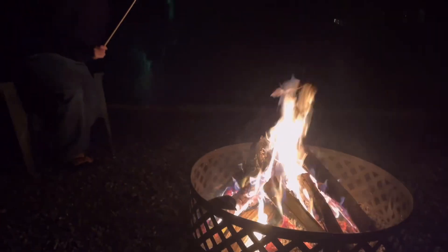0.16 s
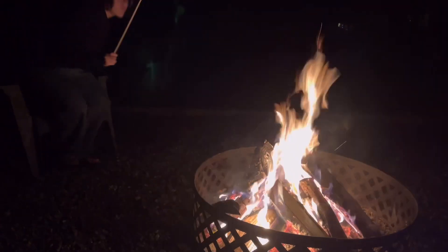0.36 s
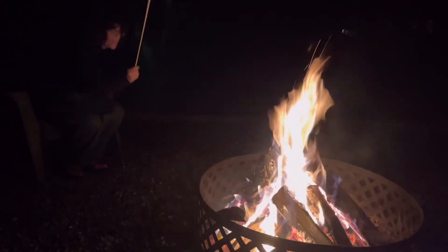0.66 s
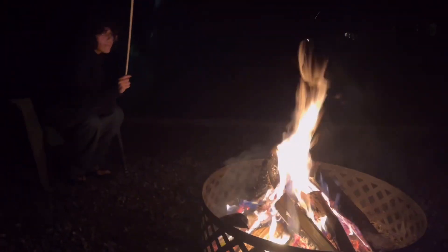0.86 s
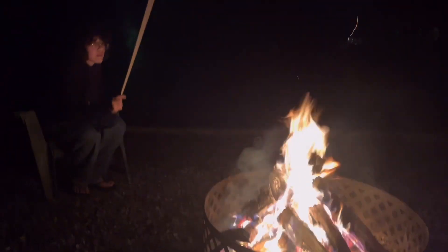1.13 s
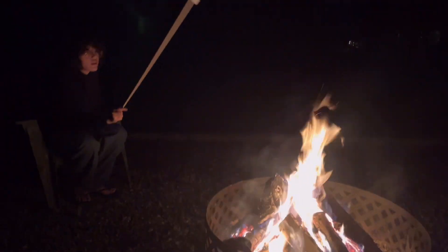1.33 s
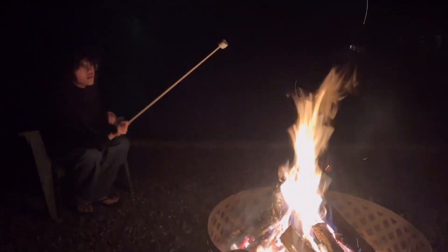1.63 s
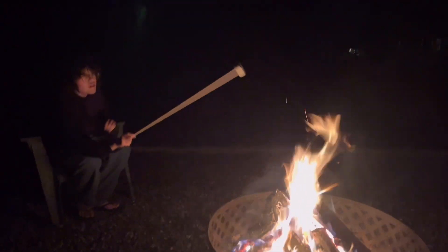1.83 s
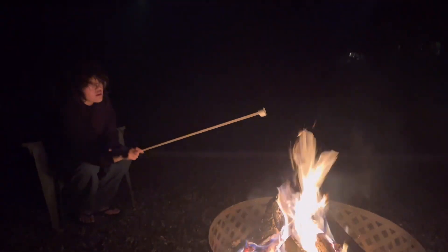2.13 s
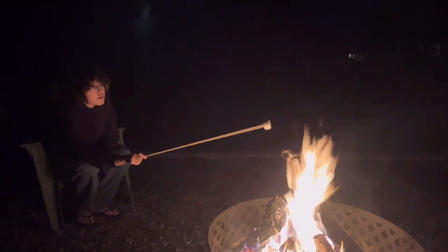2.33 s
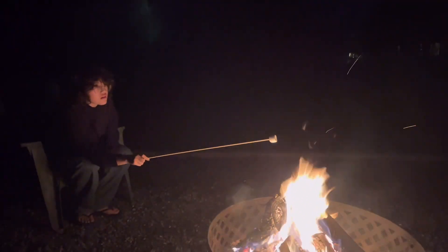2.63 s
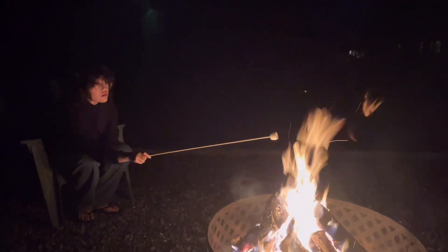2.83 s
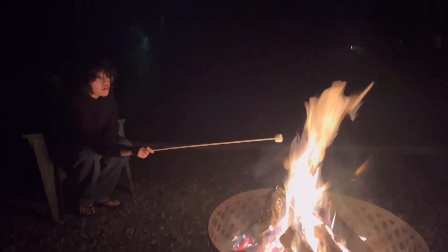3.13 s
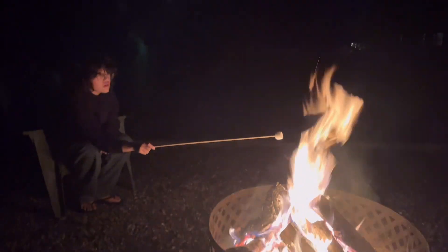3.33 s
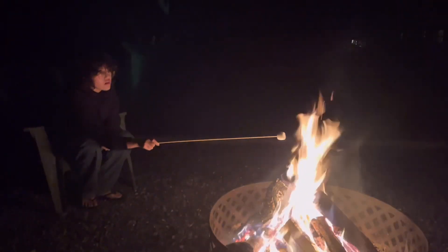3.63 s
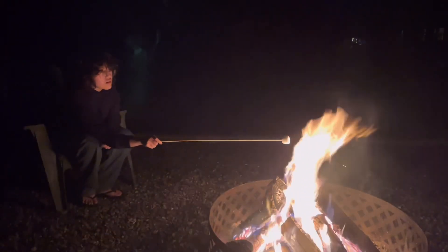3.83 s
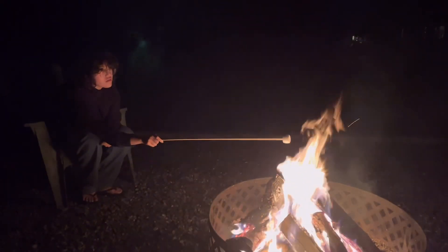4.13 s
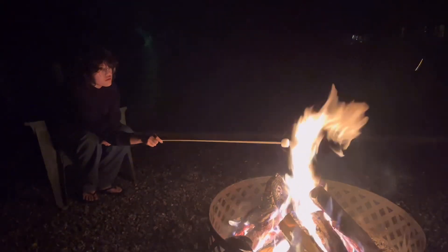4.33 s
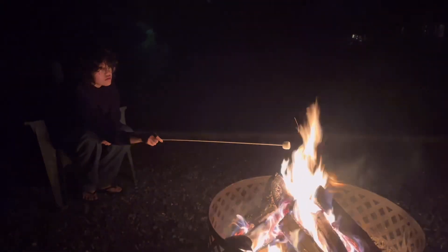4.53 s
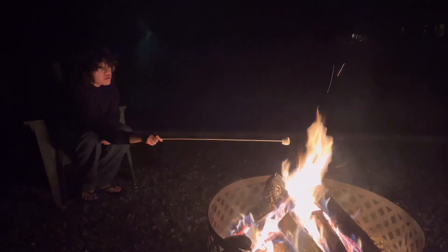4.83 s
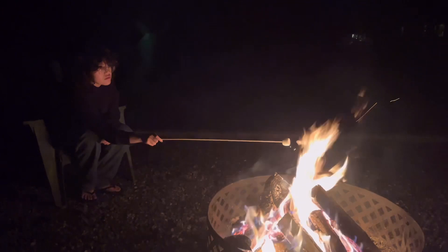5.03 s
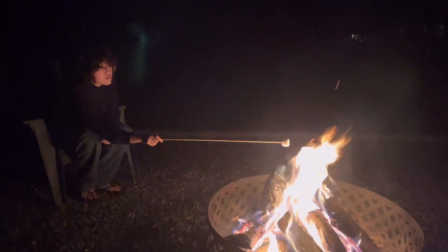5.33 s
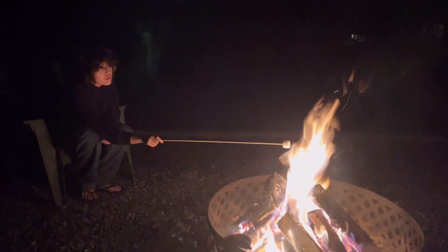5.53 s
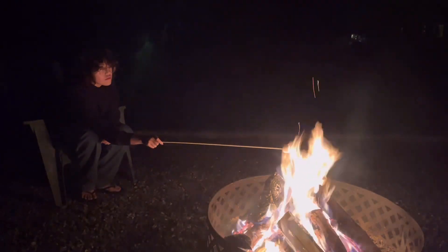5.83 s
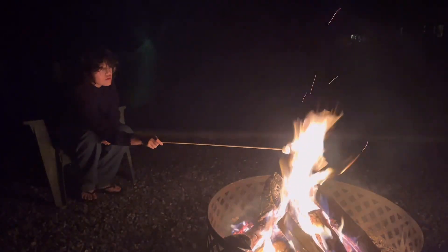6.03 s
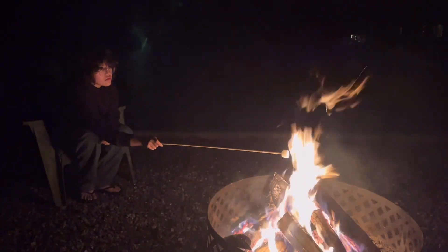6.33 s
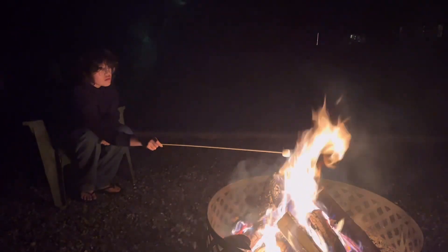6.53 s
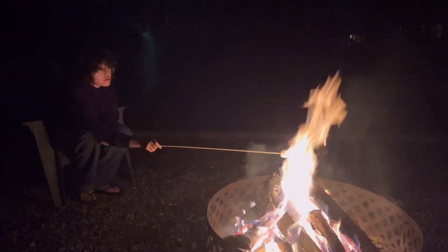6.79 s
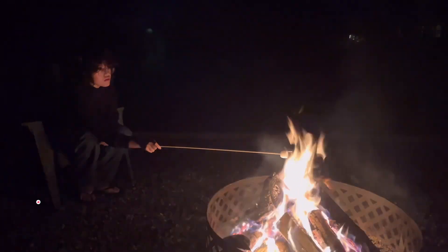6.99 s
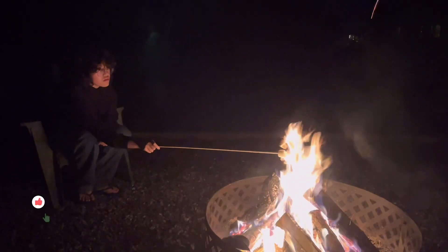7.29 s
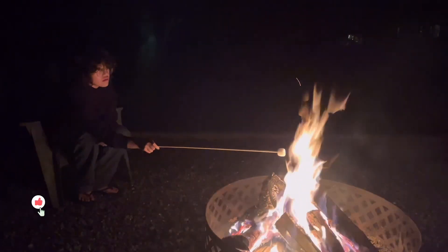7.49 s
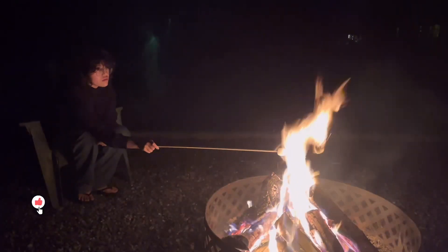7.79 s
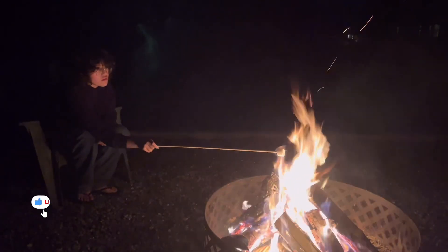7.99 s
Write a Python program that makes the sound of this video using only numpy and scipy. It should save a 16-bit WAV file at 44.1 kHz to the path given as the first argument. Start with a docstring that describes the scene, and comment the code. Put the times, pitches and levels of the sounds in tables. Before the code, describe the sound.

Close campfire snaps and pops at night, two loud bangs echoing off trees, amid a dense cricket chorus, pulsing katydid rasps and brief frog trills.

```python
"""Wood fire among night insects

A wood fire on a lawn: the flames rush low (shaped noise), the logs crackle (short decaying noise and tones)
and twice burst loudly, each burst washing back from the trees. A tree frog trills twice (upward sweeps),
crickets chirp in a dense chorus (sinking tones over noise) and a katydid rasps in swells high above them.
"""
import sys
import numpy as np
from scipy import signal
from scipy.fft import rfft, irfft, next_fast_len
from scipy.io import wavfile
from scipy.ndimage import map_coordinates

SR = 44100
rng = np.random.default_rng(int(sys.argv[2]) if len(sys.argv) > 2 else 0)


def to_wav(s):
    """Save 16-bit WAV."""
    ch = np.atleast_2d(s).T  # columns
    pcm = np.round(np.clip(ch, -1, 1) * 32767)  # PCM
    wavfile.write(sys.argv[1], SR, pcm.astype(np.int16))


N = 359415  # length in samples

# The bright snap of breaking wood. Each row: frequency in Hz, relative strength in dB per Hz.
SNAP = [(4800, -43), (5600, -8.5), (6150, 1), (6860, -6), (7440, 4), (8070, 1.5), (8700, -5.5),
        (9900, -2.5), (11000, -14.5)]
# The woody body of a crack. Each row: frequency in Hz, relative strength in dB per Hz.
BODY = [(1200, -34), (1800, -19), (2400, -5), (3100, -6), (4100, -3), (4650, 7.5), (5100, -13), (5700, -11)]
# Gas pockets bursting. Each row: start in seconds, level in dB, time to die by 60 dB in seconds,
# thud in dB relative to the burst (before its trim), level of the wash that follows in dB.
BURSTS = [(1.9973, -6, 0.047, -7.5, -29.5), (5.3402, -5, 0.042, -8.5, -31)]


def amp(db):
    """Turn decibels into a gain."""
    return 10 ** (np.asarray(db) / 20)


def unit(x):
    """Scale a sound to an average (rms) strength of 1."""
    return x / np.sqrt(np.mean(x ** 2) + 1e-20)


def along(points, hz):
    """Read a curve of (Hz, value) points on a logarithmic frequency axis."""
    f, v = np.transpose(points)
    return np.interp(np.log(hz + 1), np.log(f + 1), v)


def curves(rows):
    """Draw lines through timed rows: one value per sample for each column after the time."""
    s, *cols = np.transpose(rows)
    return [np.interp(np.arange(N) / SR, s, c) for c in cols]


def wobble(rate):
    """A smooth random curve with rate knots a second, running back over its knots if they run out."""
    knots = rng.standard_normal(2048)
    return map_coordinates(knots, [np.arange(N) * rate / SR], mode="mirror")


def filtered(x, response):
    """Multiply the spectrum of x by a response that depends on frequency."""
    m = next_fast_len(len(x) + 8192)
    hz = np.fft.rfftfreq(m, 1 / SR)
    return irfft(rfft(x, m) * response(hz), m)[:len(x)]


def resonance(f, centre, width):
    """Response of one resonance: 1 at its centre, weaker to both sides."""
    return 1j * f * width / (centre * centre - f * f + 1j * f * width)


def coloured(x, spectrum):
    """Give x a spectrum with steep skirts beyond its ends, at rms 1."""
    lo, hi = spectrum[0][0], spectrum[-1][0]

    def response(hz):
        skirts = np.minimum(hz / lo, 1) ** 4 * np.minimum(hi / (hz + 1), 1) ** 4
        return amp(along(spectrum, hz)) * skirts

    return unit(filtered(x, response))


def noise(spectrum):
    """Coloured noise of rms 1."""
    return coloured(rng.standard_normal(N), spectrum)


def add(track, s, sound):
    """Mix a sound into the track from time s, in seconds."""
    start = round(s * SR)
    part = sound[max(-start, 0):max(N - start, 0)]
    track[max(start, 0):][:len(part)] += part


def fracture(t, hold, t60):
    """Wood tears for a moment at full strength, then the sound dies by 60 dB in t60 seconds."""
    onset = 1 - np.exp(-t / 0.000099)
    return onset * amp(-60 * np.maximum(t - hold, 0) / t60)


def burst_of(source, shape):
    """A random stretch of noise under a shape, scaled to strength 1 over its first 4 ms."""
    start = int(rng.random() * (N - len(shape)))
    piece = source[start:][:len(shape)] * shape
    return piece / np.std(piece[:SR // 250])


def night_air(air_db=-37):
    """The faint, slightly swaying air of the night, as shaped noise."""
    # Each row: frequency in Hz, relative strength in dB per Hz.
    night_colour = [(150, -60), (280, -12.5), (400, 2.5), (640, 1.5), (1000, -6.5), (1380, -9), (1620, -18),
                    (2300, -8), (3200, -16.5), (5000, -35), (5600, -45), (7500, -14.5), (10000, -17.5),
                    (16000, -58.5)]
    return amp(air_db + wobble(10.0)) * noise(night_colour)


def drones():
    """Thin, grainy buzzes of far insects come and go: tones unsteady in pitch and level."""
    # Each row: start in seconds, end in seconds, middle pitch in Hz, level in dB before it wavers.
    held_notes = [(1.0, 1.52, 3494, -48), (3.25, 3.7, 3520, -52), (4.7, 5.3, 3500, -53),
                  (2.0, 2.4, 6630, -53), (3.25, 4.4, 6630, -54), (7.0, 7.34, 4950, -35)]
    out = np.zeros(N)
    for start, end, middle_hz, db in held_notes:
        hz = middle_hz + 40 * wobble(200)
        note = np.sin(2 * np.pi * np.cumsum(hz) / SR) * amp(db + 4 * wobble(90))
        size = int((end - start) * SR)
        add(out, start, note[:size] * signal.windows.tukey(size))
    return out


def cricket(chirps, top_hz, fall_hz, db, share):
    """A wing stroke slows towards its end, so every chirp sinks in pitch, each a little differently."""
    # chirps counts the cycles; the stroke fills the last share of each one
    stroke = np.clip(1 - (1 - chirps % 1) / share, 0, 1)
    hz = top_hz - fall_hz * (1 + .15 * wobble(7)) * stroke ** 2
    hz += 30 * wobble(7) + 25 * wobble(300)
    swell = np.abs(np.sin(np.pi * stroke ** 1.2))
    swell *= amp(1.5 * wobble(6) + 2.5 * wobble(150))
    return amp(db) * swell * np.sin(2 * np.pi * np.cumsum(hz) / SR)


def crickets(chorus_db=-2.5, others_db=-38, count=7):
    """Two near crickets stand out of several further ones and a far chorus blurred into noise."""
    # The far chorus. Each row: frequency in Hz, relative strength in dB per Hz.
    chorus_colour = [(3300, -20), (3900, -12), (4150, -2.5), (4470, 3.5), (4750, -2.5), (5050, -7.5),
                     (5500, -12)]
    # Its course. Each row: time in seconds, level in dB before chorus_db and the flutter are added.
    chorus_level = [(0.0, -27), (1.23, -32), (1.43, -30.5), (2.09, -31.5), (2.61, -34), (3.22, -32.5),
                    (6.17, -33.5), (6.42, -30.5), (6.7, -35.5), (8.15, -28.5)]
    # Near crickets. Each row: start of a cycle in seconds, chirps per second,
    # slowing in chirps per second each second.
    near_pace = [(-.002, 7.06, .044), (-.1, 6.13, 0)]
    # Their voices. Each row: top pitch in Hz and fall in Hz, both before wavering,
    # level in dB before flutter, sounding share of a cycle.
    near_voices = [(4317, 385, -31, 0.48), (4600, 410, -37.5, 0.39)]
    t = np.arange(N) / SR
    level_db = curves(chorus_level)[0] + chorus_db + 2.68 * wobble(60)
    out = amp(level_db) * noise(chorus_colour)
    for start, pace, size in rng.random((count, 3)):
        chirps = start + (6 + 2 * pace) * t + 0.1013 * wobble(2.6)
        out += cricket(chirps, top_hz=4400 + 380 * size, fall_hz=257.5, db=others_db, share=.4)
    for (start, rate, slowing), voice in zip(near_pace, near_voices):
        chirps = (rate - slowing * t / 2) * (t - start)
        out += cricket(chirps, *voice)
    return out


def katydid(stroke_hz=265, high_db=0, low_db=0, far_sway_db=2, uneven_db=1):
    """Fast uneven scrapes excite two wing resonances, in swells two or three times a second."""
    # Upper wing resonance. Each row: frequency in Hz, relative strength in dB per Hz.
    upper_colour = [(12300, -20), (13200, -10), (13700, -6), (14050, 1.5), (14450, -3), (15000, -13),
                    (15550, -16), (15900, -18)]
    # Lower wing resonance. Each row: frequency in Hz, relative strength in dB per Hz.
    lower_colour = [(9500, -25), (10500, -13.5), (11200, 1.5), (11600, 9), (12000, 1), (12600, 2),
                    (13400, -30)]
    # Each row: crest in seconds, level in dB, lower resonance in dB relative to the upper,
    # half length in seconds.
    swell_rows = [(0.284, -21, -9, 0.089), (0.97, -24, -8, 0.13), (1.203, -39, -0.5, 0.13),
                  (1.686, -24, -6.5, 0.096), (1.95, -39, -4, 0.057), (2.322, -26, -19, 0.083),
                  (2.745, -25.5, -4.5, 0.079), (3.174, -25.5, -14, 0.11), (3.613, -27.5, -4.5, 0.086),
                  (4.067, -25.5, -13, 0.11), (4.277, -27.5, -3.5, 0.084), (4.755, -25, -12, 0.1),
                  (5.202, -26.5, -3, 0.085), (5.65, -24, -9, 0.076), (6.02, -28, -1, 0.088),
                  (6.46, -27.5, -7, 0.11), (6.91, -29, -1, 0.086), (7.38, -29.5, -8, 0.12),
                  (7.577, -28.5, 0, 0.091), (8.036, -28, -7, 0.12)]
    swell_shape = 1.6  # 1 is pointed, 2 is a bell
    far_high_db, far_low_db = -45, -44.5  # rasp of further katydids, before it sways
    t = np.arange(N) / SR
    far = amp(far_sway_db * wobble(3.7))
    upper, lower = amp(far_high_db) * far, amp(far_low_db) * far
    for s, db, lower_rel, half in swell_rows:
        swell = amp(db) * np.exp(-np.abs((t - s) / half) ** swell_shape)
        upper = np.hypot(upper, swell)
        lower = np.hypot(lower, amp(lower_rel) * swell)
    phase = 2 * np.pi * np.cumsum(stroke_hz * (1 + 0.19 * wobble(40))) / SR
    scrape = (1 + .3 * np.sin(phase)) * amp(1.5 * wobble(700) + .8 * wobble(90))
    teeth = scrape * amp(uneven_db * wobble(25)) * rng.standard_normal(N)
    high_rasp = amp(high_db) * upper * coloured(teeth, upper_colour)
    low_rasp = amp(low_db) * lower * coloured(teeth, lower_colour)
    return high_rasp + low_rasp


def frog(pulse_gap=.0415, echo_s=.047, echo_db=-13, pitch_scatter=.012, jitter=0.016):
    """A tree frog's trill: quick upward sweeps, boosted by the vocal sac; a wall answers each one."""
    # Each row: first pulse in seconds, last pulse in seconds, level in dB before scatter and the sac.
    trill_rows = [(.009, 0.381, -17), (1.876, 2.335, -20)]
    # One pulse. Each row: seconds from its middle, pitch in Hz before scatter, relative level in dB.
    pulse_rows = [(-.018, 816, -30), (-.009, 912, -3), (0, 1076, -7.5), (.006, 1193, -0.5),
                  (0.01, 1300, -6), (0.017, 1310, -11)]
    # Harmonics. Each row: multiple of the pitch, relative level in dB before the sac.
    harmonics = [(1, -13.5), (2, -2.5), (3, -18)]
    # The vocal sac: frequency in Hz, width in Hz, boost in dB.
    sac_hz, sac_width, boost_db = (2180, 140, 8.9)
    out = np.zeros(N)
    when, pitch, level = np.transpose(pulse_rows)
    t = np.arange(when[0], when[-1], 1 / SR)
    waver = 1 + jitter * wobble(300)
    for first, last, db in trill_rows:
        for s in np.linspace(first, last, round((last - first) / pulse_gap) + 1):
            # each sweep is a little steeper or flatter, higher or lower
            sweep = np.interp(t * (1 + .1 * rng.normal()), when, pitch)
            sweep *= waver[abs(round(s * SR)):][:len(t)] + pitch_scatter * rng.normal()
            phase = 2 * np.pi * np.cumsum(sweep) / SR
            voice = sum(amp(part_db) * np.sin(round(k) * phase) for k, part_db in harmonics)
            pulse = amp(db + np.interp(t, when, level) + rng.normal()) * voice
            add(out, s + when[0], pulse)
            add(out, s + when[0] + echo_s, amp(echo_db) * pulse)
    out = filtered(out, lambda f: 1 + (amp(boost_db) - 1) * resonance(f, sac_hz, sac_width))
    return out * (1 + .18 * wobble(600))


def yard(x, delay=.012):
    """Trees and walls scatter the sound back as a tail of noise that dies at its own pace in each band."""
    # Each row: frequency in Hz, time for the tail to die by 60 dB in seconds.
    dying_times = [(200, 0.16), (2200, 0.71), (5000, 0.25), (12000, 0.18)]
    hz, t, z = signal.stft(rng.standard_normal(SR), SR, nperseg=256)
    decay = amp(-60 * t / along(dying_times, hz)[:, None])
    tail = signal.istft(z * decay, SR, nperseg=256)[1]
    tail = np.pad(tail / np.linalg.norm(tail), (round(delay * SR), 0))
    return signal.fftconvolve(x, tail)[:N]


def wash(flutter_db=3.0):
    """The trees around the lawn return each burst as a breathy, pitched wash that swells and dies."""
    # Each row: frequency in Hz, relative strength in dB per Hz.
    wash_colour = [(700, -21), (1150, -13.5), (1380, -5.5), (1580, -20), (1790, -8), (2080, -16), (2320, 5),
                   (2480, -14), (2750, -14.5), (4000, -42)]
    crest_s, steepness = 0.092, .85  # time to the crest; steepness of rise and fall
    level, age = np.zeros(N), np.arange(SR) / SR / crest_s
    for s, *_, db in BURSTS:
        add(level, s, amp(db) * (age * np.exp(1 - age)) ** steepness)
    return level * amp(flutter_db * wobble(50)) * noise(wash_colour)


def flames(flutter_db=1.0, sway_db=1.0):
    """Turbulent flames rush low: shaped noise that flutters, sways and slowly dies down."""
    # Each row: frequency in Hz, relative strength in dB per Hz.
    rush_colour = [(25, -42), (35, -42), (50, -19), (65, -12.5), (100, -7.5), (130, -5), (158, 0.5),
                   (172, -2), (190, -8.5), (212, -10), (250, -23), (300, -20), (380, -27.5)]
    start_db, fade_db_per_s = -19.5, 0.23
    level_db = start_db - fade_db_per_s * np.arange(N) / SR
    rush = noise(rush_colour) * amp(flutter_db * wobble(30) + sway_db * wobble(6))
    return amp(level_db) * unit(rush)


def rustle(count=20, spread_db=3, tilt_db_per_octave=-1.5):
    """A quick uneven run of blips, the higher ones tending to be fainter."""
    from_s, to_s, base_db = 6.9, 8.9, -32
    low_hz, high_hz, half_length_s = 656, 3220, 0.0078
    order, (late, size, pitch) = np.arange(count), rng.random((count, 3)).T
    when = from_s + (to_s - from_s) * (order + late) / count
    hz = low_hz * (high_hz / low_hz) ** pitch
    db = base_db + spread_db * size + tilt_db_per_octave * np.log2(hz / low_hz)
    return list(zip(when, db, hz, np.full(count, half_length_s)))


def blips(width=0.19, level_db=0, scuff_db=-7):
    """Short soft blips of narrow noise, each with a grainy scuff, mostly bunched near the end."""
    # Each row: middle in seconds, level in dB, pitch in Hz, half length in seconds.
    blip_rows = [(1.84, -23, 1020, 0.0091), (3.06, -29, 610, 0.02), (3.349, -21.5, 650, 0.0074),
                 (5.657, -28.5, 980, 0.031), (6.486, -31, 706, 0.016), (7.626, -30, 1200, 0.017),
                 (7.676, -31.5, 2320, 0.015), (7.69, -33, 1400, 0.019), (7.761, -31.5, 1790, 0.022),
                 (7.878, -28, 850, .028), (8.065, -27.5, 2650, .009), (8.068, -31, 910, 0.02),
                 (8.101, -28, 1210, 0.013)]
    out = np.zeros(N)
    # Each pair: frequency in Hz, relative strength in dB per Hz.
    scuff = noise([(300, 18), (900, 5), (1600, -15), (2400, -5), (3500, -12), (6000, -25)])
    scuff = unit(scuff * amp(8.6 * wobble(250)))
    for s, db, hz, half in blip_rows + rustle():
        band = lambda f: 1 / (1 + ((f - hz) / (width * hz)) ** 2)
        grain = filtered(rng.standard_normal(SR // 4), band)[:int(2 * half * SR)]
        scuff_start = int(rng.random() * (N - SR))
        grain = unit(grain) + amp(scuff_db) * scuff[scuff_start:][:len(grain)]
        add(out, s - half, amp(db + level_db) * grain * np.hanning(len(grain)))
    return out


def patter(count=1500, middle_hz=1200, cycles=16, spread_db=4.5):
    """Small dull ticks of settling fuel, each a few cycles of one pitch; a busier rustle near the end."""
    # Each row: time in seconds, base level of a tick in dB before its random size and a doubling.
    tick_level = [(0, -36.5), (1.3, -38), (1.7, -42), (7.5, -42.5), (7.7, -33), (8.15, -33)]
    t = np.arange(SR // 30) / SR
    when, size, pitch = rng.random((count, 3)).T[:, :, None]
    hz = middle_hz * 2.5 ** (2 * pitch - 1)
    db = np.interp(when * N / SR, *np.transpose(tick_level)) - spread_db * np.log(size + 0.015)
    decay = amp(db - 60 * t * hz / cycles)  # falls by 60 dB within the given cycles
    grains = decay * np.sin(2 * np.pi * hz * t) * (1 - np.exp(-t * hz))
    at = (when * N).astype(int) + np.arange(len(t))
    return np.bincount(at.ravel(), 2 * grains.ravel(), N)[:N]


def embers(count=520, db=-46, spread_db=6.5):
    """Countless tiny ticks from the glowing bark, some bright, some dull, most faint."""
    out, t = np.zeros(N), np.arange(SR // 50) / SR
    snap, body = noise(SNAP), noise(BODY)
    shape = fracture(t, hold=.0005, t60=.009)
    for when, size, bright in rng.random((count, 3)):
        tick = bright * burst_of(snap, shape) + np.sqrt(1 - bright) * burst_of(body, shape)
        tick_db = db - spread_db * np.log(size + 0.018)  # a few stand out
        add(out, when * N / SR, amp(tick_db) * tick)
    return out


def small_cracks(count=16, db=-32, fizz_db=-5, body_db=2, knock_db=-12, spread_db=2.0):
    """Lesser cracks come at random moments, each with its own size, colour and pitch."""
    splinter_hz, scatter = 4670, 0.11  # middle ringing pitch; scatter as a share of it
    typical_db = np.array([db, fizz_db, body_db, knock_db])
    rows = []
    for when, pitch, *luck in rng.random((count, 6)):
        levels_db = typical_db + spread_db * (2 * np.array(luck) - 1)
        ring_hz = splinter_hz * (1 + scatter * (2 * pitch - 1))
        rows.append((when * N / SR, *levels_db, ring_hz))
    return rows


def crackles(snap_db=0, fizz_db=0, body_db=-1, ring_db=-4, knock_db=-1, tear_s=0.0016):
    """Each crack is a snap with a fizzy edge, a ringing splinter and a duller knock of the log."""
    # The loudest cracks. Each row: start in seconds, snap level in dB, then fizz, body and knock in dB
    # relative to the snap (before the trims above), ringing pitch in Hz.
    crack_rows = [(0.151, -28, 0, 8, -13, 4900), (0.1782, -19.5, -2, -9, -24, 2510),
                  (0.357, -23, -9, -0.5, -20, 4600), (0.4406, -19, 3.5, -12, -22, 4650),
                  (0.554, -24.5, -2, 0, -24, 4210), (0.6855, -24, 3, 6, 0, 4240),
                  (0.877, -25, -17, -1, -10, 4870), (0.9065, -22, -13, -1, -2, 4450),
                  (0.9702, -21, -17, 9, -12, 4750), (1.1606, -27.5, -10, 1.5, -6, 4200),
                  (1.423, -34.5, 15.5, -12, -18, 4810), (1.5515, -18, -15, 3, -24, 4780),
                  (2.1417, -39.5, -8, 17, 15, 4560), (2.3289, -33, -15, -7, -17, 2006),
                  (2.9189, -18.5, 2, 5, -31, 4940), (2.9546, -21.5, -13, -5, -15, 4440),
                  (2.99, -25, 2, 1, -25, 4640), (3.158, -30, -10, 13.5, -18, 4450),
                  (3.3463, -34.5, -21, 13, 2, 4880), (3.4451, -25.5, -18, -3, -21, 4800),
                  (3.6142, -29.5, -13, 7, -21, 4840), (3.6908, -20.5, -2, 5, -6, 4370),
                  (3.8912, -17, -5, 2, -9.5, 4440), (3.992, -30.5, -6, 11.5, -18, 4640),
                  (4.3271, -30, -13, 7, 5, 4820), (4.3765, -16.5, -7, 1.5, -34, 4680),
                  (4.4286, -15.5, -7, 0.5, -23, 3460), (4.4648, -21, -10, 2, -28, 4850),
                  (4.6264, -14.5, -1, 2.5, -11, 4110), (4.9213, -36.5, 1, 17.5, 0, 4420),
                  (5.466, -22, 1, 0.5, -8, 2230), (5.6785, -31.5, 17.5, -6, 4, 4350),
                  (5.843, -28, -2, 5.5, -10, 4400), (5.9717, -30.5, -13, 6.5, -3, 4730),
                  (6.084, -29.5, -5, 9, -22, 4740), (6.5433, -25.5, 7, 6, -27, 4800),
                  (6.9552, -22.5, -10, 6.5, -25, 4770), (7.4902, -27, -7, 5.5, -17, 4220),
                  (7.5205, -31.5, 5, 9.5, 3, 3930), (7.5544, -24, -9, 1, -22, 4870),
                  (7.641, -25.5, 1, 3, -5, 4360), (7.8102, -27.5, -14, 10.5, 0, 4060),
                  (7.9104, -26.5, 0, -1, 1, 3020), (7.9302, -28, -14, 4, 5.5, 1690),
                  (8.0045, -34, 5, 7, 5, 2340), (8.1145, -27, -13, -3, -10, 4930)]
    # The fizzy edge. Each row: frequency in Hz, relative strength in dB per Hz.
    fizz_colour = [(9500, -9.5), (10600, -5), (11500, 5.5), (12600, -30), (14300, -7), (15800, -4)]
    # The dull knock. Each row: frequency in Hz, relative strength in dB per Hz.
    knock_colour = [(120, -35), (350, -1), (1200, -5), (1600, -1), (2400, -14)]
    out, t = np.zeros(N), np.arange(SR // 20) / SR
    snap, fizz, body, knock = noise(SNAP), noise(fizz_colour), noise(BODY), noise(knock_colour)
    for s, db, fizz_rel, body_rel, knock_rel, hz in crack_rows + small_cracks():
        hold = tear_s * amp(db + 24.0) ** .5  # bigger cracks tear for longer
        sharp, woody = fracture(t, hold, t60=.011), fracture(t, hold, t60=.016)
        crack = amp(snap_db) * burst_of(snap, sharp)
        crack += amp(fizz_rel + fizz_db) * burst_of(fizz, sharp)
        crack += amp(body_rel + body_db) * burst_of(body, woody)
        crack += amp(body_rel + ring_db) * 2 * np.sin(2 * np.pi * hz * t) * woody
        crack += amp(knock_rel + knock_db) * burst_of(knock, fracture(t, hold, t60=0.05))
        add(out, s, amp(db) * crack)
    return out


def bursts(thud_gain_db=-4):
    """Gas pockets blow open and ring the whole log with a thud."""
    # Resonances of the log. Each row: frequency in Hz, width in Hz, relative level in dB.
    log_modes = [(661, 110, -9), (885, 53, -1), (1230, 240, -7), (1785, 28, -6), (2316, 80, 1),
                 (4290, 240, -13.5), (4770, 72, -7), (8350, 270, -23)]
    out, t = np.zeros(N), np.arange(SR // 8) / SR

    def ringing(f):
        # neighbouring resonances take opposite signs
        return sum((-1) ** k * amp(db) * resonance(f, centre, width)
                   for k, (centre, width, db) in enumerate(log_modes))

    wood = unit(filtered(rng.standard_normal(N), ringing))
    thud = noise([(120, -15), (310, 3.5), (480, -1.5), (900, -13)])  # (Hz, dB per Hz)
    for s, db, t60, thud_db, _ in BURSTS:
        ring = burst_of(wood, fracture(t, hold=0.00047, t60=t60))
        thump = burst_of(thud, fracture(t, hold=0.0053, t60=0.051))
        add(out, s, amp(db) * (ring + amp(thud_db + thud_gain_db) * thump))
    return out


def scene():
    """The fire is close and dry; the frog sits further off among the trees."""
    pops = crackles() + embers() + patter() + bursts()
    trill = frog()
    echoes = amp(-14.0) * yard(pops) + amp(-14.5) * yard(trill)
    insects = crickets() + drones() + katydid()
    fire = flames() + pops + wash() + blips()
    return (night_air() + insects + trill + fire + echoes)[None]


def gain_control(x, threshold_db=0.5, attack_s=0.0075, release_db_per_s=14):
    """A peak over the threshold turns the gain down; it then creeps back."""
    recovery = release_db_per_s * np.arange(N) / SR
    over_db = np.maximum(20 * np.log10(np.abs(x) + 1e-9) - threshold_db, 0)
    held_db = np.maximum.accumulate(over_db + recovery) - recovery
    keep = np.exp(-1 / (attack_s * SR))
    cut_db = signal.lfilter([1 - keep], [1, -keep], held_db)
    return x * amp(-cut_db)


def record(dry):
    """The microphone port colours the treble, loud peaks duck the gain and are rounded, and the band ends."""
    # Narrow peaks and dips of the port. Each row: frequency in Hz, width in Hz, boost or cut in dB.
    port_rows = [(1615, 76, -23), (3230, 110, -38), (5494, 360, -21), (7190, 210, -29), (7374, 52, 8.5),
                 (8160, 470, -24.5), (8550, 62, 7.5), (9520, 61, -27), (9690, 130, 10), (9740, 290, -37),
                 (12070, 140, 6.5), (13550, 200, -32), (13100, 120, 8), (12140, 400, -31),
                 (14480, 100, 10.5)]
    ceiling, top_hz = .88, 15850  # peaks stay below the ceiling; nothing passes from top_hz up

    def port(f):
        return np.prod([1 + (amp(db) - 1) * resonance(f, centre, width)
                        for centre, width, db in port_rows], axis=0)

    heard = gain_control(filtered(dry[0], port))
    rounded = heard / (1 + np.abs(heard / ceiling) ** 6) ** (1 / 6)
    return filtered(rounded, lambda hz: hz < top_hz)[None]


dry = scene()
out = record(dry)
to_wav(out)
```